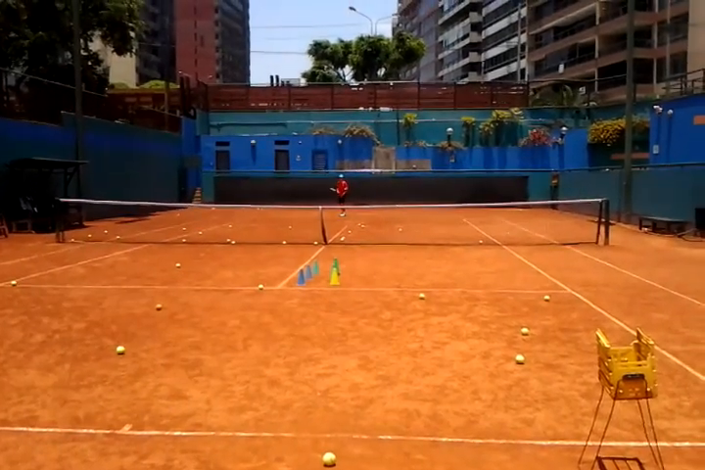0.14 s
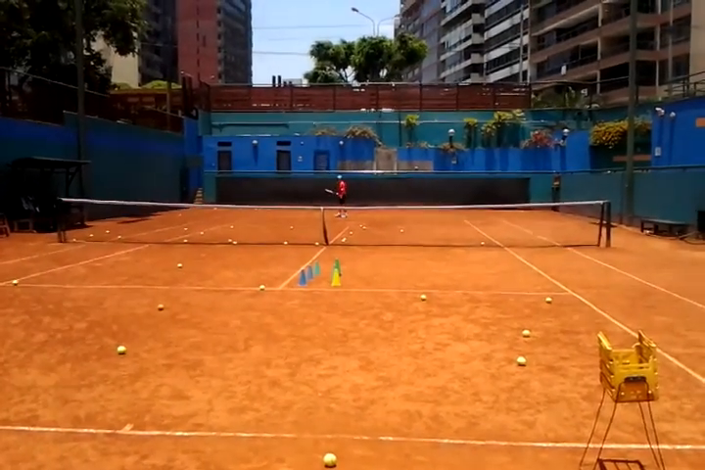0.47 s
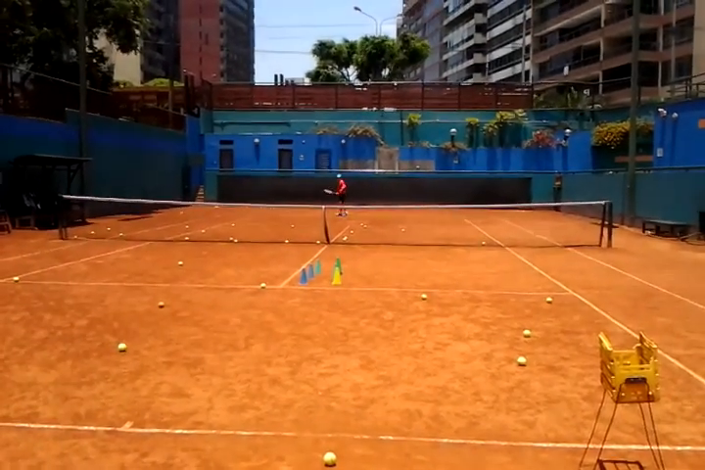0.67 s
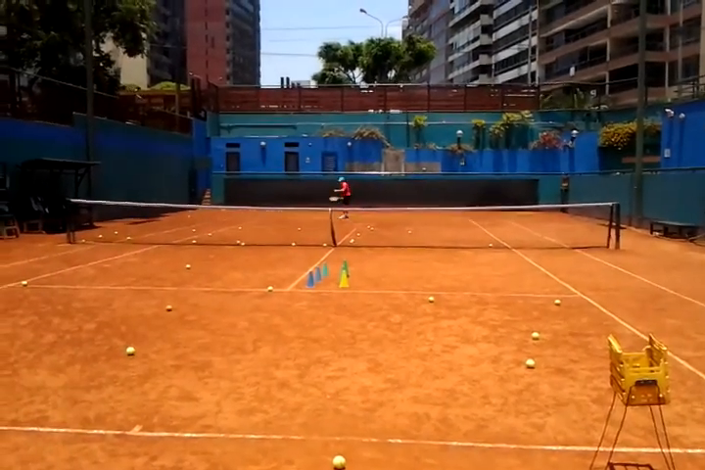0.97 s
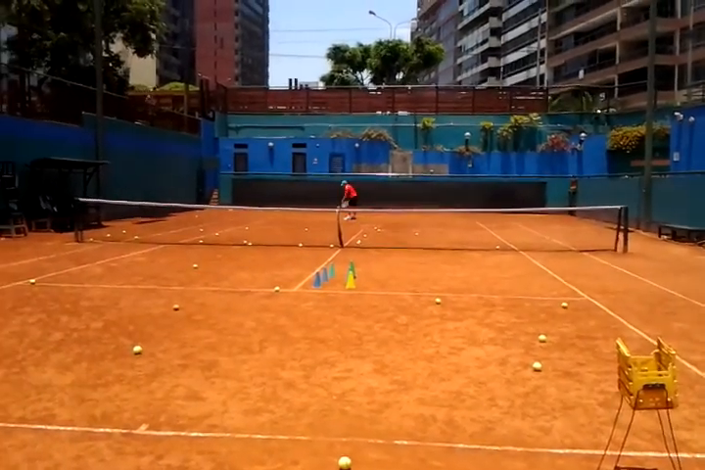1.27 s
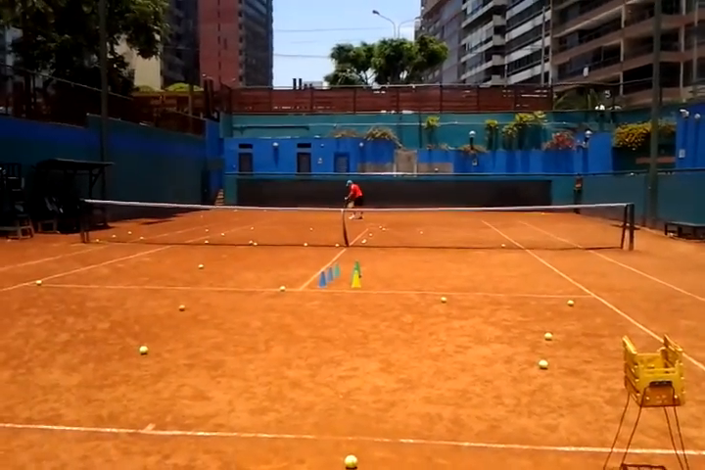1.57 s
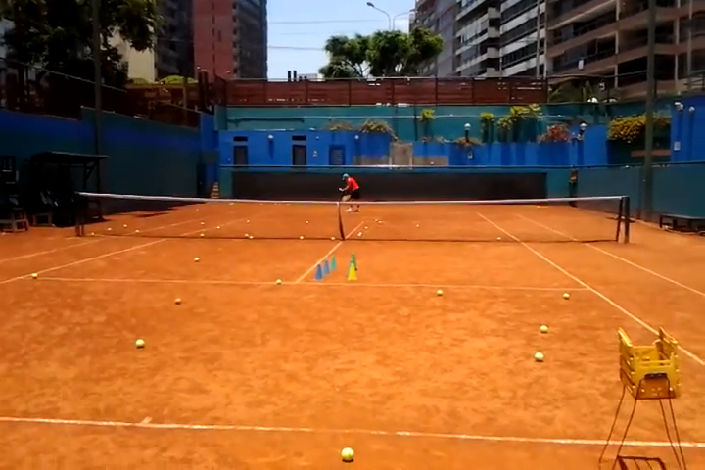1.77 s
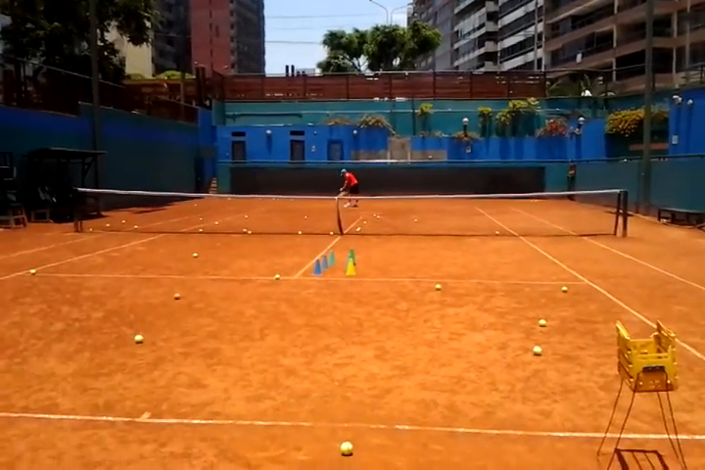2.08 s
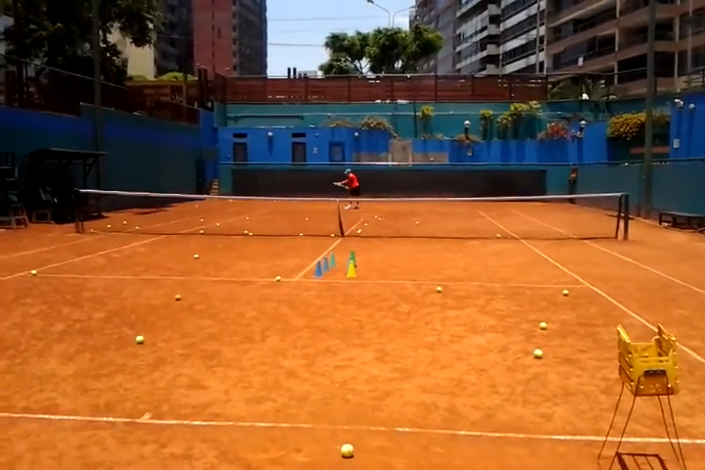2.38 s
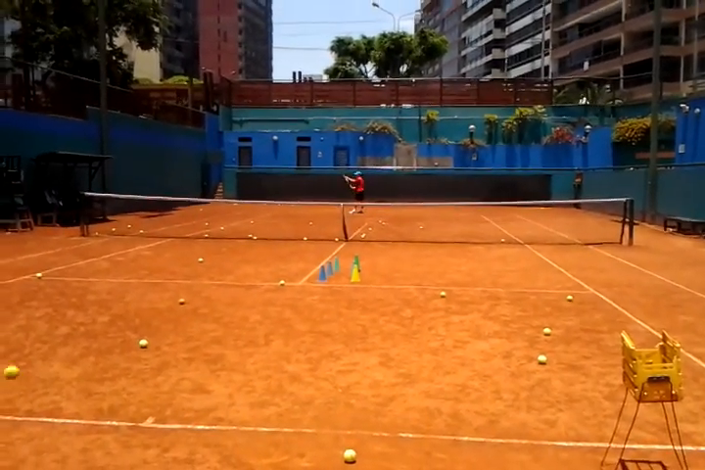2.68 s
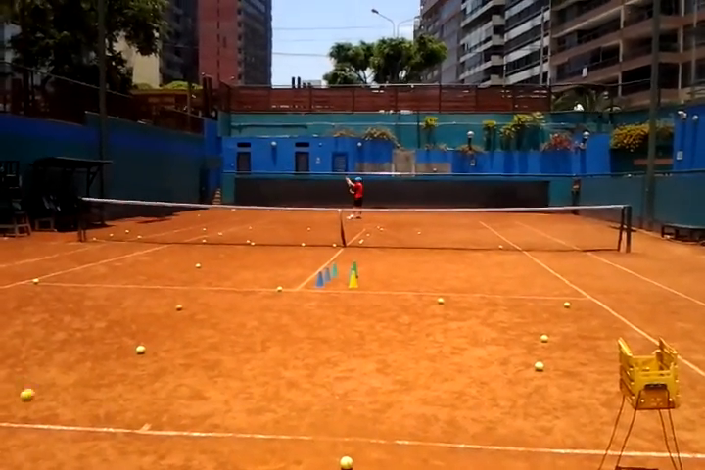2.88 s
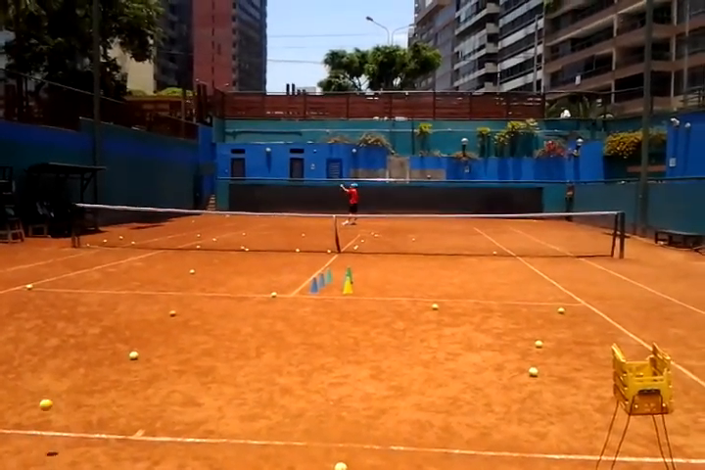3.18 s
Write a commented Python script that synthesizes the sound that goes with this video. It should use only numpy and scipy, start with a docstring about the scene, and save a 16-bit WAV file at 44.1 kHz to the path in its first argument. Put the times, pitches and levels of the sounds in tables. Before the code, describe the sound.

Hollow tennis ball knocks on a walled outdoor clay court: the loudest at 0.7 s, a slightly softer one at 1.0, a weaker one at 2.0 and a faint one at 2.8, each with a short slap of echo. Steady low traffic rumble throughout; very faint bird whistle until 0.6, distant engine rising 0.8-2.2, thin squeals near 1.3 and 1.8, tiny shoe scrape at 3.0. Small camera, dull treble.

```python
"""Short hollow knocks of a ball struck and bouncing on a walled clay tennis court in a city, heard by a
small camera at the baseline; ground and walls mirror them. Behind: traffic rumble, a distant engine
picking up speed, a thin squeal, a faint bird, a brief scrape of a shoe.
Knocks are chirped snaps with decaying sines and noise tails; traffic and scrape are filtered noise;
engine, squeal and bird are unsteady sines."""
import sys
import numpy as np
from scipy import signal
from scipy.fft import rfft, irfft
from scipy.io import wavfile
from scipy.ndimage import uniform_filter1d

SR = 44100
rng = np.random.default_rng(int(sys.argv[2]) if len(sys.argv) > 2 else 0)


def log_audio(samples):
    """Write samples as a 16-bit WAV file to the path given in sys.argv[1]."""
    # one column per channel
    frames = np.atleast_2d(samples).T
    # limit to full scale, then quantise
    limited = np.clip(frames, -1, 1)
    pcm = np.round(limited * 32767).astype(np.int16)
    wavfile.write(sys.argv[1], SR, pcm)


def volts_from_db(level):
    """Convert decibel levels to linear amplitude ratios."""
    exponent = np.asarray(level, float) / 20
    return 10 ** exponent


N = 147294


def col(table, k, t):
    """Column k of a time table, joined by straight lines."""
    table = np.array(table, float)
    return np.interp(t, table[:, 0], table[:, k])


def unit(x):
    """Scale to rms 1."""
    return x / np.sqrt(np.mean(x ** 2))


def band(x, hz, width_hz):
    """Resonant band-pass, gain 1 at the centre."""
    return signal.lfilter(*signal.iirpeak(hz, hz / width_hz, fs=SR), x)


def lowpass(x, order, hz):
    """Butterworth low-pass."""
    return signal.lfilter(*signal.butter(order, hz, fs=SR), x)


def walk(rate_hz):
    """Random levels held 1 / rate_hz and slewed twice; rms 1."""
    k = int(SR / rate_hz)
    held = np.repeat(rng.standard_normal(N // k + 1), k)
    return unit(uniform_filter1d(uniform_filter1d(held, k), k)[:N])


def burst(t, start_s, length_s):
    """Half-sine swell."""
    return np.sin(np.pi * np.clip((t - start_s) / length_s, 0, 1))


def fall(t, t60_s):
    """Exponential decay, 60 dB in t60_s."""
    return np.exp(-np.log(1000) * t / t60_s)


def town(t):
    """Half-octave bands of coloured noise that swell with the traffic and flicker alone."""
    # traffic spectrum: f/Hz, relative density/dB per Hz
    colour = np.array([(12, -39), (20, -1), (37, 1.5), (76, -3.5), (108, -7.5), (138, -10.5), (177, -13),
                       (216, -13.5), (313, -20.5), (400, -22.5), (650, -23.5), (1000, -27), (1650, -31.5),
                       (2500, -36), (3300, -41), (4200, -45), (4900, -51.5), (6000, -55), (7000, -60.5),
                       (9000, -55)], float)
    # traffic swell: t/s, relative level/dB of bands centred below 150 Hz, above 150 Hz
    swell = [(0, -1, 0.5), (.4, -0.5, 1), (.8, 0, 1), (1.2, -2, 1.5), (1.6, -1.5, 1), (2.0, 1.5, 2),
             (2.4, -2.5, 0.5), (2.8, 0.5, 1.5), (3.34, 2.5, 1.5)]
    f = np.maximum(np.fft.rfftfreq(N, 1 / SR), 1)
    density_db = np.interp(np.log(f), np.log(colour[:, 0]), colour[:, 1])
    spectrum = rfft(rng.standard_normal(N)) * volts_from_db(density_db)
    place = np.clip(2 * np.log2(f / 20), -2, 18)  # half octaves above 20 Hz
    out = 0
    for k in range(-2, 19):
        part = irfft(spectrum * np.clip(1 - np.abs(place - k), 0, 1), N)
        swell_db = col(swell, 1 if k < 6 else 2, t)
        out = out + part * volts_from_db(swell_db + 0.85 * walk(6.3))
    return volts_from_db(-32.5) * unit(out)


def engine(t):
    """Two orders of an engine cycle, slightly unsteady in pitch and level."""
    # distant engine: t/s, mean cycle f/Hz, 2nd order mean level/dB rms, 3rd order mean level/dB rms
    orders = [(.8, 62.25, -49, -61), (.95, 62.93, -41, -60), (1.35, 68, -40, -55.5),
              (1.5, 68.5, -62.5, -47.5), (1.63, 69.5, -36, -49.5), (1.75, 71.03, -61, -49),
              (2.05, 76, -64, -54.5), (2.2, 77, -64, -63)]
    cycle_hz = col(orders, 1, t) * (1 + 0.0063 * walk(11))
    phase = 2 * np.pi * np.cumsum(cycle_hz) / SR
    out = 0
    for k in (2, 3):
        peak_db = col(orders, k, t) + 3 + 1.5 * walk(10)  # sine peak is 3 dB over rms
        out = out + volts_from_db(peak_db) * np.sin(k * phase)
    return out * (t > .8) * (t < 2.2)


def bird(t):
    """A far whistle that rises, holds, drops and adds short chips, broken up by the air."""
    # whistle: t/s, mean f/Hz, mean peak level/dB
    whistle = [(0, 6450, -77), (.04, 6470, -86), (.08, 6500, -79), (.15, 6480, -82), (.19, 6550, -92),
               (.22, 6720, -77), (.235, 6820, -86), (.25, 6900, -77), (.295, 6900, -75), (.304, 6800, -84),
               (.312, 6700, -75), (.322, 6500, -86), (.335, 6280, -74), (.355, 6000, -75), (.37, 5900, -98),
               (.375, 6800, -98), (.385, 6680, -74), (.4, 6600, -92), (.42, 6850, -90), (.43, 6780, -78),
               (.445, 6700, -98), (.545, 6850, -98), (.56, 6760, -73), (.58, 6680, -100)]
    phase = 2 * np.pi * np.cumsum(col(whistle, 1, t) + 30 * walk(90)) / SR
    level_db = col(whistle, 2, t) + 3 * walk(60)
    return volts_from_db(level_db) * np.sin(phase) * (t < whistle[-1][0])


def squeals(t):
    """A thin wavering tone, perhaps brakes in the street."""
    # squeals: start t/s, length/s, mean f/Hz, peak level before flutter/dB
    tones = [(1.235, .065, 3970, -65.5), (1.31, .09, 3975, -66), (1.7, .12, 3975, -64.5),
             (1.79, .095, 3980, -64.5)]
    waver = np.cumsum(walk(120)) / SR
    flutter = volts_from_db(3 * walk(110))
    out = 0
    for start_s, length_s, hz, db in tones:
        tone = np.sin(2 * np.pi * (hz * t + 25 * waver))
        out = out + volts_from_db(db) * burst(t, start_s, length_s) ** .5 * tone
    return flutter * out


def slides(t):
    """Gritty scrape of a shoe on clay: grains of uneven size in a broad band."""
    # slides: start t/s, length/s, level at the crest/dB rms
    scrapes = [(2.996, 0.063, -55)]
    grains = rng.standard_normal(N) * volts_from_db(1.3 * walk(400))
    grit = unit(band(grains, 1800, 880))
    return grit * sum(volts_from_db(db) * burst(t, start_s, length_s) for start_s, length_s, db in scrapes)


def blow(t, at_s, snap_hz, cycles, speedup, sustain, ring_db, thump_db):
    """The ball snaps flat as a short chirp, then thumps and rings as it springs back."""
    # modes of the hollow ball: f/Hz, level/dB re ring, t60/s at sustain 1
    modes = [(960, -3, .021), (1136, -5.5, .017)]
    spring_s, thump_hz, thump_t60_s, snap_top_hz = .05e-3, 235, .04, 4600
    contact_s = cycles / snap_hz
    p = np.clip((t - at_s) / contact_s, 0, 1)
    envelope = np.abs(np.sin(np.pi * p ** 1.35)) ** .5 * (p < 1)  # crest past mid-contact
    snap = np.sin(2 * np.pi * cycles * p ** speedup) * envelope
    u = np.maximum(t - at_s - contact_s - spring_s, 0)
    ring = sum(volts_from_db(db) * np.sin(2 * np.pi * hz * u) * fall(u, t60_s * sustain) for hz, db, t60_s in modes)
    thump = -np.sin(2 * np.pi * thump_hz * u) * fall(u, thump_t60_s)
    return lowpass(snap + volts_from_db(ring_db) * ring + volts_from_db(thump_db) * thump, 2, snap_top_hz)


def court(tail):
    """Reverberation of the court: banded noise with a fast and a slow decay."""
    hiss = rng.standard_normal(len(tail))
    noise = unit(band(band(hiss, 1200, 1600.), 1200, 1600.))
    decay = volts_from_db(-37.5) * fall(tail, 0.11) + volts_from_db(-25) * fall(tail, .055)
    return noise * np.minimum(tail / 0.0049, 1) * decay  # 4.9 ms onset


def spit(tail):
    """A spit of grit from the clay: broad decaying noise."""
    return unit(band(rng.standard_normal(len(tail)), 4000, 8800)) * fall(tail, 0.026)


def knocks(t):
    """Each blow with its spit of grit, sent back by ground, walls and court, then low-passed."""
    # knock starts: t/s
    knock_s = [.67951, 1.00825, 1.9737, 2.84387]
    # knocks: gain/dB, snap f/Hz, snap cycles, chirp exponent (1 = even, >1 speeds up),
    # ring t60 factor, then levels re snap/dB: ring, thump, grit
    strikes = [(-14.7, 1300, 1.0, 1.5, .9, -2.3, -10.5, -42), (-18, 1380, 1.1, 1.15, .32, -4.5, -6, -29),
               (-26, 2690, 2.13, .9, 1.1, -1.5, -3.5, -34), (-30.3, 1030, .99, 1.07, 1.9, -2.7, 0, -32)]
    # echoes of each knock: near lag/ms, near level/dB, near low-pass f/Hz, nearest wall lag/ms
    echoes = [(8.76, -18, 1800, 41), (2.51, -3.5, 5000, 38), (2.36, -8, 2600, 21), (3.65, -10, 2000, 42)]
    # walls: lag after the nearest wall/ms, level before band-pass/dB
    walls = [(0, -14), (13, -19), (64, -20)]
    out, tail = np.zeros(N), t[:SR // 2]
    for s, strike, echo in zip(knock_s, strikes, echoes):
        db, *ball, grit_db = strike
        lag_ms, echo_db, echo_hz, wall_ms = echo
        near_echo = lowpass(blow(t, s + lag_ms / 1000, *ball), 2, echo_hz)
        near = blow(t, s, *ball) + volts_from_db(echo_db) * near_echo
        returns = sum(volts_from_db(wall_db) * blow(t, s + (wall_ms + ms) / 1000, *ball) for ms, wall_db in walls)
        far = band(returns, 1100., 1400.)
        k = int(s * SR)
        near[k:k + len(tail)] += (court(tail) + volts_from_db(grit_db) * spit(tail))[:N - k]
        out += volts_from_db(db) * (near + far)
    return lowpass(out, 3, 6200)  # air


def scene():
    """All sources, one microphone."""
    t = np.arange(N) / SR
    background = town(t) + engine(t) + bird(t) + squeals(t)
    return (background + slides(t) + knocks(t))[None]


def top_cut(x):
    """Nothing passes above the cut-off."""
    return signal.sosfilt(signal.butter(12, 7610, fs=SR, output="sos"), x)


def record(dry):
    """Steep low-pass at 7350 Hz, then the finished mix."""
    steep = signal.cheby2(14, 35, 7350, fs=SR, output="sos")  # 35 dB stopband from 7350 Hz
    mix = signal.sosfilt(steep, dry)
    return top_cut(mix)


dry = scene()
out = record(dry)
log_audio(out)
```